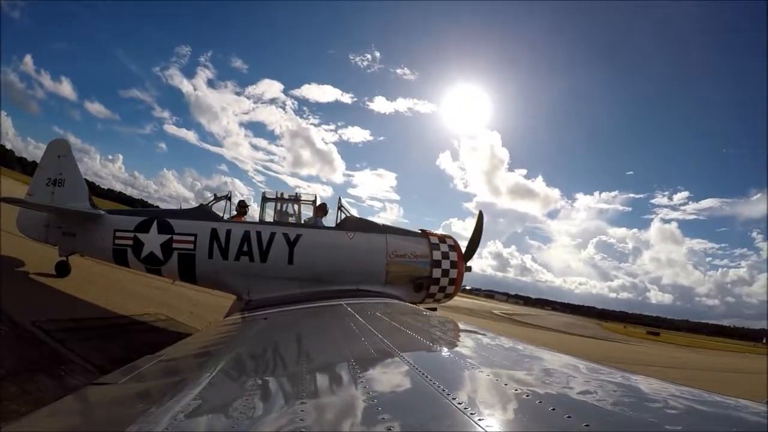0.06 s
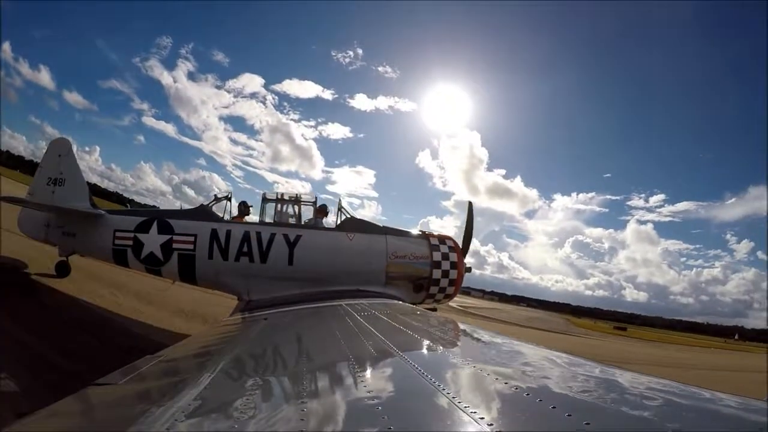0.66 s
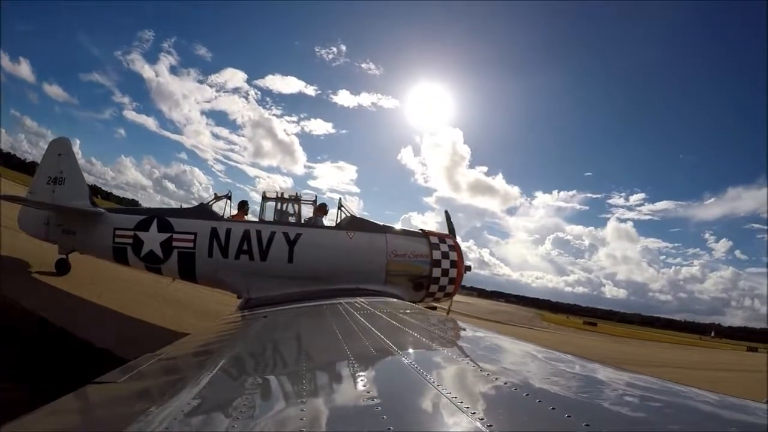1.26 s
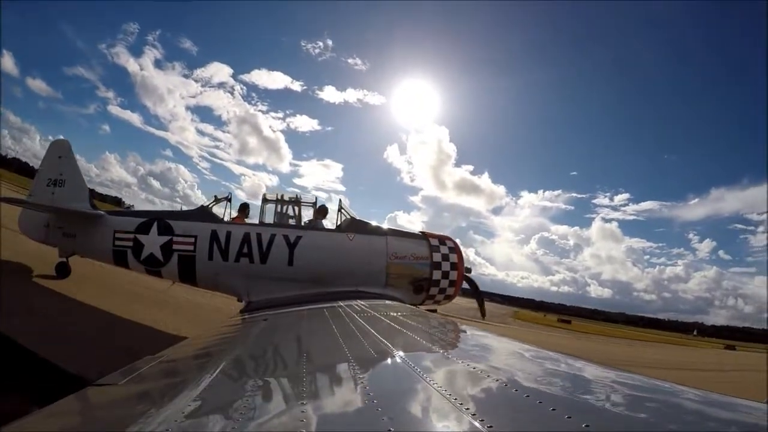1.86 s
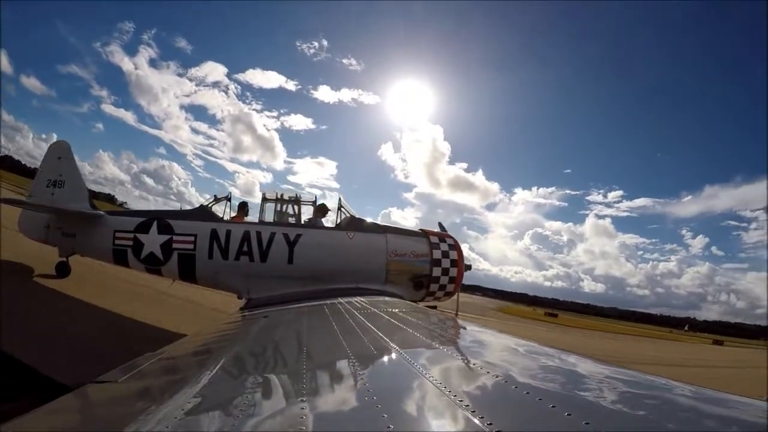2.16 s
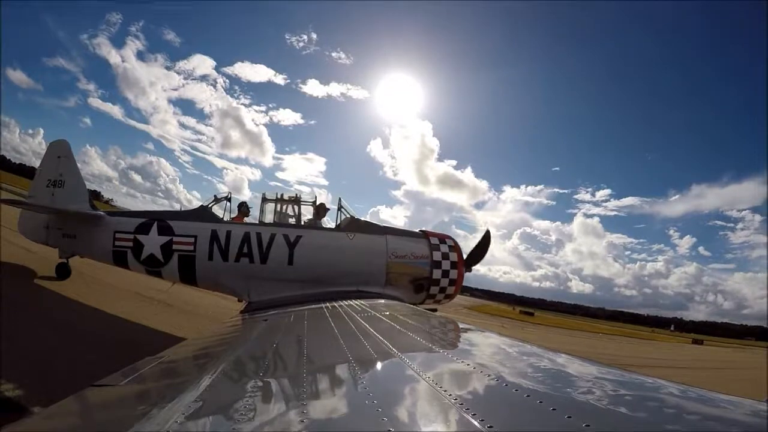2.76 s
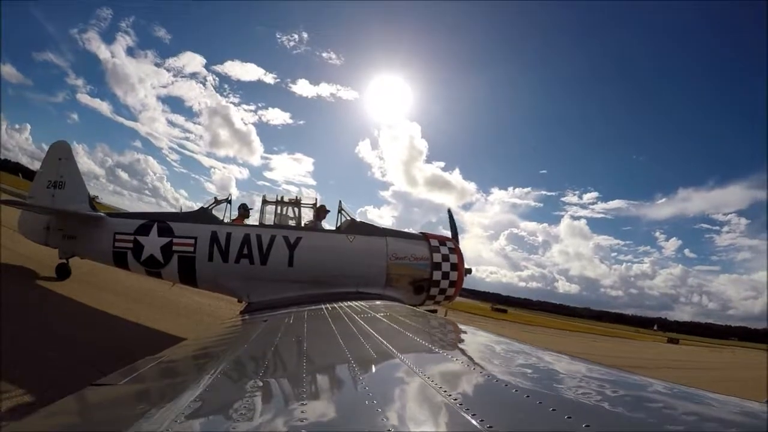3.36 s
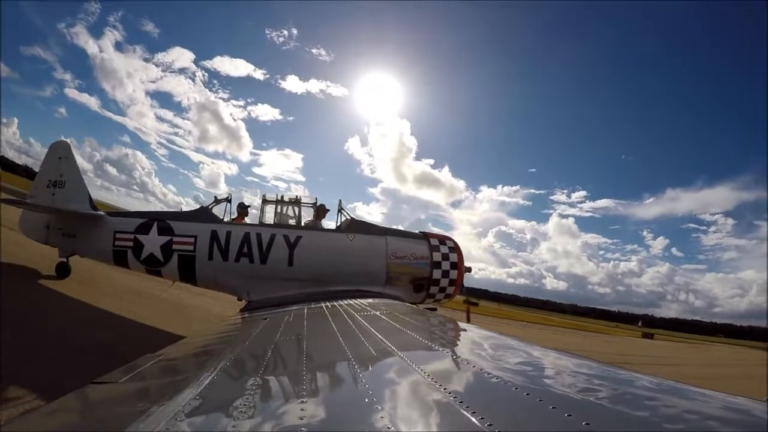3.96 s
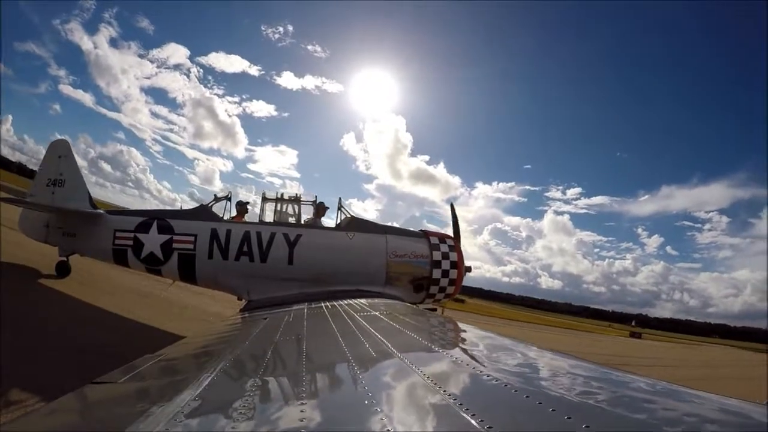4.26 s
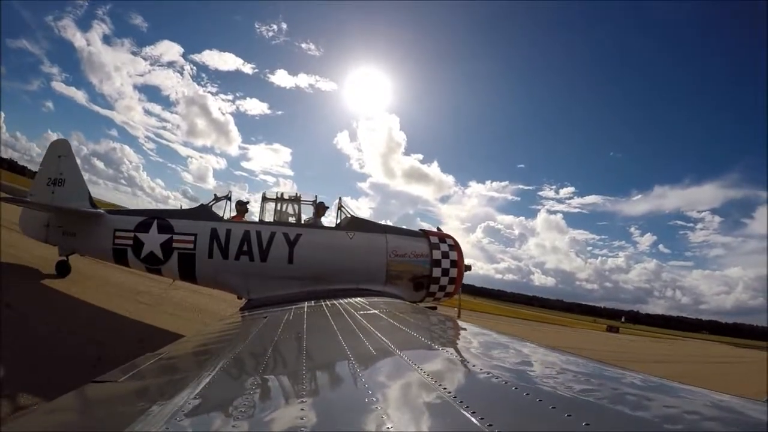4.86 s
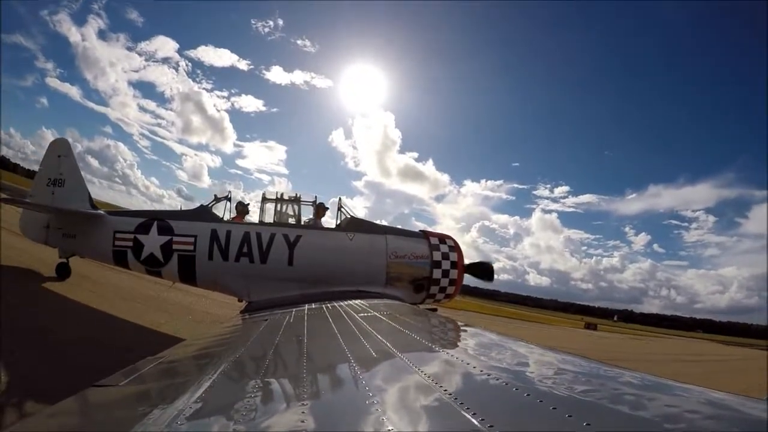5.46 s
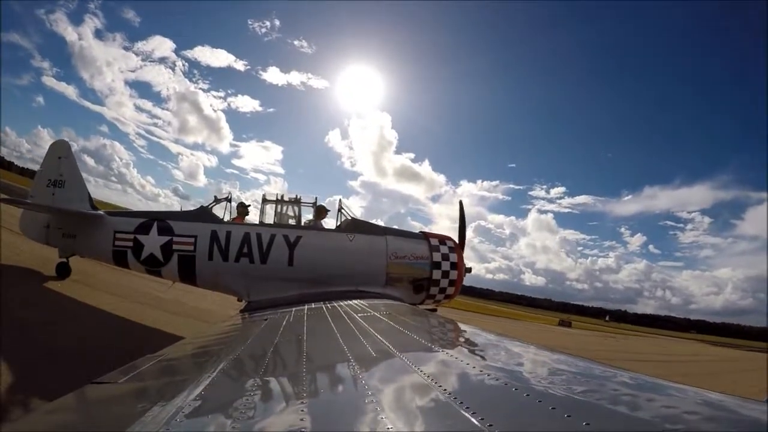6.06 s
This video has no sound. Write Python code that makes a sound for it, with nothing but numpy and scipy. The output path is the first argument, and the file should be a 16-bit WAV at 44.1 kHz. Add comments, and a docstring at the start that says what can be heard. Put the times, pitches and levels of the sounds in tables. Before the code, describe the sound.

Close up, a taxiing propeller plane's engine thumps evenly, its exhaust cracking irregularly while propeller wash rumbles on the microphone.

```python
"""A nine-cylinder radial aircraft engine taxiing at low power, close up, from a microphone on the wing.
Each cylinder thumps and spits through the exhaust in its turn; some firings crack sharply, the pipe
rings and the jet whistles at its lip. The two-blade propeller chops the air and its wash buffets the
microphone. The low layers swell, hold and sink with the engine's effort; a limiter holds the peaks."""
import sys
import numpy as np
from scipy import signal
from scipy.fft import rfft, irfft
from scipy.io import wavfile
from scipy.ndimage import uniform_filter1d, minimum_filter1d

SR = 44100
rng = np.random.default_rng(int(sys.argv[2]) if len(sys.argv) > 2 else 0)


def wav_out(sig):
    """Save sig, one row per channel (or a flat mono array), as 16-bit PCM at SR to the path in sys.argv[1]."""
    wavfile.write(sys.argv[1], SR, np.round(np.clip(np.atleast_2d(sig).T, -1, 1) * 32767).astype(np.int16))


N = 269010
TIME = np.arange(N) / SR
CYLINDERS, BLADES = 9, 2

# how hard the exhaust spits: (time [s], rasp level [dB], hiss level [dB])
SPIT_LEVELS = [(0, -56.5, -62.5), (0.5, -53, -54), (0.9, -54, -59.5), (1.45, -51, -55.5),
               (1.75, -52.5, -63.5), (2.05, -50.6, -50.5), (2.35, -54, -65), (2.8, -53, -59.5),
               (3.0, -55.5, -59.0), (3.25, -51, -59.5), (3.55, -54, -60.5), (4.0, -54, -57),
               (4.65, -49.5, -58), (4.9, -55.5, -61), (5.4, -56.5, -63), (6.1, -59, -65.5)]
# firings that crack: (time [s], level [dB], rasp offset [dB], snap offset [dB], whistle pitch [Hz])
CRACK_EVENTS = [(0.0842, -42, -11, -8, 2350), (0.404, -41.5, -13, -4.5, 2190),
                (0.4624, -39, -15, -10, 2370), (0.4748, -34, -13, -10, 3940),
                (0.5172, -35, -12, -16.5, 4350), (0.5876, -38, -10, -11, 2350),
                (0.6594, -41, -15, -10, 2400), (0.7178, -34, -7, -24, 2370), (1.1014, -30, -6, -16, 2390),
                (1.3588, -38, -15, -5, 2380), (1.487, -35, -8, -14, 2310), (1.6162, -36, -8, -14, 3100),
                (1.8736, -33.5, -2.5, -16, 2660), (2.0053, -36.5, -5, -7, 2480),
                (2.0198, -39, -3, -13, 2480), (2.0782, -37, -14, -13, 2920), (2.1335, -35, -18, -12, 2420),
                (2.2623, -32.5, -5, -11, 2300), (2.5227, -36, -3, -12, 2310),
                (2.7821, -34.5, -5, -15, 2390), (3.6845, -37.5, -3.5, -19, 2410),
                (3.8127, -36, -7, -15, 3000), (4.0701, -37.5, -7, -9, 2540),
                (4.3271, -30.5, -7.5, -25, 2470), (4.597, -34, -12.5, -13, 2460),
                (4.7112, -30, -13, -11, 3370), (5.0963, -36.5, -6, -13, 2350)]
# spectrum of gas rasping out of the pipe: (frequency [Hz], relative level [dB])
RASP_SPECTRUM = [(500, -15), (1300, -4), (1900, -7.5), (2200, -7.5), (2400, 3.5), (2750, -10.5),
                 (3050, -1.5), (3400, -7), (4200, -12), (6000, -20.5), (8000, -29), (11000, -55.5)]
# spectrum of air chopped by a blade: (frequency [Hz], relative level [dB])
CHOP_SPECTRUM = [(150, -23.5), (300, -3), (450, 2), (550, -3), (760, 4.5), (930, -1.5), (1050, 1),
                 (1170, -4), (1330, 0), (1700, -8), (2500, -21.5), (5000, -36.5), (9000, -72.5)]


def gain_of(db):
    """Decibels to amplitude."""
    return 10 ** (np.asarray(db) / 20)


def unit_rms(x):
    """Scales to rms 1."""
    return x / np.sqrt(np.mean(x ** 2) + 1e-20)


def curve(rows, column=1):
    """One column of a time table, at every sample."""
    rows = np.array(rows)
    return np.interp(TIME, rows[:, 0], rows[:, column])


def colour(x, spectrum):
    """Minimum-phase filter with the given spectrum; the result has rms 1."""
    hz, db = np.transpose(spectrum)
    grid = abs(np.fft.fftfreq(8192, 1 / SR))
    log_gain = np.log(gain_of(np.interp(np.log(grid + 1), np.log(hz + 1), db)))
    ring = np.fft.ifft(np.exp(np.conj(signal.hilbert(log_gain)))).real
    return unit_rms(signal.oaconvolve(x, ring[:len(ring) // 2])[:N])


def drift(hz):
    """Smooth random wander of rms 1, no faster than about hz."""
    f = np.fft.rfftfreq(N, 1 / SR)
    return unit_rms(irfft(rfft(rng.standard_normal(N)) * np.exp(-(f / hz) ** 2), N))


def recurring(turns, likeness):
    """Noise that partly repeats from one turn to the next."""
    turn, place = np.divmod(turns - np.floor(turns.min()), 1)
    size = int(N / np.ptp(turns))
    fresh = rng.standard_normal((int(turn.max()) + 1, size))
    carried = signal.lfilter([1], [1, -likeness], fresh, axis=0)
    return unit_rms(carried[turn.astype(int), (place * size).astype(int)])


def beats(turns):
    """Samples at which a count of turns passes a whole number."""
    return np.flatnonzero(np.diff(np.floor(turns)) > 0)


def train(at, size, shape):
    """The same shape started at each given sample, each with its own size."""
    kicks = np.zeros(N)
    kicks[at] = size
    return signal.oaconvolve(kicks, shape)[:N]


def puff(rise_s, decay_s):
    """Pressure of a burst of gas: a quick swell and an exponential fall."""
    t = TIME[:SR // 10]
    shape = (1 - np.exp(-(t / rise_s) ** 2)) * np.exp(-t / decay_s)
    return shape / shape.max()


def bursts(times, db, shape, spectrum):
    """Short puffs of coloured noise at the given times and levels."""
    envelope = train((times * SR).astype(int), gain_of(db), shape)
    return envelope * colour(rng.standard_normal(N), spectrum)


def effort_gain(top_db, follows):
    """Gain of a layer that swells and sinks by `follows` dB per dB of engine effort."""
    # engine effort: (time [s], level relative to its top [dB])
    effort = [(0, -3), (1.1, -1), (3.0, -1.2), (4.6, 0.0), (6.1, -5.5)]
    return gain_of(top_db + follows * curve(effort))


def wash(rush_db=-1.0):
    """The slipstream buffets the wing and the microphone over a soft rush of air."""
    # wind on the microphone: (frequency [Hz], relative level [dB])
    buffet_spectrum = [(10, -33), (35, -17.5), (55, -12), (76, -5), (88, -3), (100, -0.5), (112, -3),
                       (128, -14), (160, -19.5), (250, -29), (600, -52), (3000, -76.5)]
    # rushing air: (frequency [Hz], relative level [dB])
    rush_spectrum = [(100, 1), (700, 1.5), (1800, -8), (2400, -1), (4000, -9), (5200, -14), (6100, -9.5),
                     (7000, -24), (8500, -35), (11000, -72.5)]
    buffet = effort_gain(top_db=-38, follows=1.4) * colour(rng.standard_normal(N), buffet_spectrum)
    rush = gain_of(curve(SPIT_LEVELS) + rush_db) * colour(rng.standard_normal(N), rush_spectrum)
    return buffet + rush


def slaps(trim_db=-4.0):
    """Now and then a blade meets rough air and slaps."""
    # loud blade slaps: (time [s], level [dB])
    slap_events = [(0.833, -45), (0.896, -42.5), (0.928, -43), (1.029, -37.5), (2.051, -41), (2.35, -35.5),
                   (2.415, -41), (3.476, -41.5), (4.663, -43), (5.08, -41), (5.598, -44.5)]
    times, db = np.transpose(slap_events)
    return bursts(times, db + trim_db, puff(rise_s=0.0027, decay_s=0.0022), CHOP_SPECTRUM)


def blade_tones(blade, sweep_passes=0.45, waver=0.2, harmonic_limit=42):
    """The steady part of the chop: harmonics of the blade rate, the higher ones arriving first."""
    # spectrum of the blade passing: (frequency [Hz], level per harmonic [dB])
    tone_spectrum = [(250, -65.5), (310, -58.5), (370, -62), (460, -68), (560, -74.5), (700, -74.5),
                     (820, -67.5), (950, -80), (1300, -75)]
    hz, db = np.transpose(tone_spectrum)
    harmonic = np.arange(1, harmonic_limit)[:, None]
    blade_hz = np.ptp(blade) * SR / N
    gain = gain_of(np.interp(harmonic * blade_hz, hz, db, left=-100))
    delay = sweep_passes * (1 - harmonic / (2 * harmonic_limit))
    tones = gain * np.cos(2 * np.pi * harmonic * (blade - delay))
    return tones.sum(0) * (1 + waver * drift(11))


def propeller(crank, lag_passes=0.02, flutter_passes=0.0026, spread_db=0.4, chop_db=-5, tones_db=-2.0):
    """Each blade strikes the air alike, and chops through partly the same eddies as the last."""
    # strength of the chop: (time [s], level [dB])
    chop_levels = [(0, -57), (0.6, -52), (0.95, -47.5), (1.25, -52), (2.1, -53.5), (2.75, -50),
                   (3.05, -52.5), (4.3, -54), (4.65, -52), (6.1, -55.1)]
    blade = crank * BLADES - lag_passes + flutter_passes * drift(25)
    at = beats(blade)
    strength = gain_of(-spread_db * rng.standard_normal(len(at)))
    passes = train(at, strength, puff(rise_s=0.007, decay_s=0.0095))
    roughness = gain_of(3.2 * drift(530))
    chop = colour(passes * roughness * recurring(blade, likeness=0.58), CHOP_SPECTRUM)
    return gain_of(curve(chop_levels) + chop_db) * chop + gain_of(tones_db) * blade_tones(blade)


def drone(crank, waver=0.027):
    """Clean low tones: blade passing, the firing rate and their relatives."""
    # engine orders: (frequency [multiples of crankshaft speed], relative level [dB])
    orders = [(2, -7.5), (3.5, -10.5), (4.5, 2.5), (5.5, -15.5), (6, -7.5), (6.5, -15), (9, -22.5),
              (10.5, -19.5), (13.5, -18), (18, -37.5), (19.5, -27), (20, -24), (20.5, -28.5)]
    tones = np.zeros(N)
    for order, db in orders:
        gain = gain_of(db) * (1 + waver * drift(4.4))
        tones += gain * np.cos(2 * np.pi * (order * crank + rng.random()))
    return effort_gain(top_db=-36, follows=1.36) * tones


def whistle(hz, swell_cycles=5.1, decay_cycles=20.0, fall_per_s=5.6):
    """A few dozen cycles of tone that sink as the jet slows."""
    envelope = puff(swell_cycles / hz, decay_cycles / hz)
    age = TIME[:len(envelope)] - swell_cycles / hz
    falling_hz = hz * np.exp(-fall_per_s * age)
    return envelope * np.sin(2 * np.pi * np.cumsum(falling_hz) / SR)


def lip_whistles(crank, crack_db=-14.5, faint_db=-0.5, spread_db=1.5, tilt_db=-1.0,
                 share=0.8, low_hz=2300, high_hz=6400):
    """The jet whistles at the pipe's lip: on every crack, and faintly at a chance pitch on many firings."""
    at = beats(crank * CYLINDERS / 2)
    chance, pitch = rng.random((len(at), 2)).T
    pitches_hz = low_hz * (high_hz / low_hz) ** (pitch ** 1.5)
    scatter_db = spread_db * rng.standard_normal(len(at))
    levels_db = curve(SPIT_LEVELS)[at] + faint_db + scatter_db + tilt_db * pitch
    faint = np.transpose([at / SR, pitches_hz, levels_db])[chance < share]
    loud = [(start_s, hz, db + crack_db) for start_s, db, _, _, hz in CRACK_EVENTS]
    out = np.zeros(N)
    for start_s, hz, db in np.vstack([faint, loud]):
        tone = gain_of(db) * whistle(hz)
        rest = out[int(start_s * SR):]
        rest[:len(tone)] += tone[:len(rest)]
    return out


def pipe(gas):
    """Adds the short metallic ring of the exhaust pipe."""
    # pipe resonances: (frequency [Hz], bandwidth [Hz], gain [dB])
    modes = [(2375, 81, -4.5), (2770, 130, -9.5), (3050, 72, -1.5), (3680, 140, -6)]
    return gas + sum(gain_of(db) * signal.lfilter(*signal.iirpeak(hz, hz / width, fs=SR), gas)
                     for hz, width, db in modes)


def cracks(rasp_trim_db=-6.5, snap_trim_db=-2.0):
    """The loudest firings crack out of the pipe: a burst of rasp with a bright snap."""
    # bright edge of a crack: (frequency [Hz], relative level [dB])
    snap_spectrum = [(1500, -16.5), (3000, 0), (4000, 3), (5000, -5.5), (6000, 3.5), (7000, -6),
                     (8500, -18), (10400, -26.5), (11500, -37)]
    times, db, rasp_db, snap_db, _ = np.transpose(CRACK_EVENTS)
    shape = puff(rise_s=0.0014, decay_s=0.0034)
    rasp = bursts(times, db + rasp_db + rasp_trim_db, shape, RASP_SPECTRUM)
    snap = bursts(times, db + snap_db + snap_trim_db, shape, snap_spectrum)
    return rasp + snap


def exhaust(crank, lead_firings=0.15, jitter_s=0.00072, push_db=-10, rasp_trim_db=-7.5,
            hiss_trim_db=-4.0, push_spread_db=3.5, rasp_spread_db=2.5, hiss_spread_db=3.5):
    """Every cylinder fires once in two turns: a thump, a rasp and a jet of hiss."""
    # balance of the cylinders, in firing order: (thump [dB], rasp [dB], hiss [dB])
    cylinder_levels = [(-7.5, -4.5, -11.5), (4.5, -4.5, 7), (2.5, -2, 4), (6, -10.5, -1.5), (1, -2.5, -5),
                       (-2.5, 0, 2.5), (7, 3, 4.5), (-10, 1, 4.5), (5, -11, -7.5)]
    # low pulse of a firing: (frequency [Hz], relative level [dB])
    thump_spectrum = [(20, -65.5), (60, -14.5), (100, -4.5), (135, 3), (152, -3), (175, 1), (215, -1),
                      (240, -17), (278, -2.5), (310, 2), (345, -7.5), (400, -15.5), (600, -29), (1500, -56)]
    # jet of escaping gas: (frequency [Hz], relative level [dB])
    hiss_spectrum = [(1500, -1.5), (3000, -5), (4000, 2), (5200, 0.5), (5900, 6.5), (6400, 2.5),
                     (7000, -4.5), (8500, -19.5), (10400, -32.5), (11500, -22.5)]
    firing = crank * CYLINDERS / 2 + lead_firings
    at = beats(firing)
    cylinder = np.round(firing[at]).astype(int) % CYLINDERS
    thump_db, rasp_db, hiss_db = np.array(cylinder_levels)[cylinder].T
    late, weight, burn, jet = rng.standard_normal((len(at), 4)).T
    at = np.clip(at + (late * jitter_s * SR).astype(int), 0, N - 1)
    push = train(at, gain_of(thump_db + push_spread_db * weight), [1.])
    puffs = train(at, gain_of(thump_db), puff(rise_s=0.0033, decay_s=0.0049))
    # each cylinder's gas swirls down the pipe much as it did the cycle before
    swirl = puffs * recurring(crank / 2, likeness=0.85)
    thump = colour(gain_of(push_db) * unit_rms(push - push.mean()) + unit_rms(swirl), thump_spectrum)
    valve = signal.windows.hann(int(0.016 * SR)) ** 2  # the valve opens and shuts smoothly
    rasp_flow = train(at, gain_of(rasp_db + rasp_spread_db * burn), valve)
    hiss_flow = train(at, gain_of(hiss_db + hiss_spread_db * jet), valve)
    spurts = gain_of(1.5 * drift(700))  # the gas leaves raggedly
    rasp = colour(rasp_flow * spurts * rng.standard_normal(N), RASP_SPECTRUM)
    hiss = colour(hiss_flow * spurts * rng.standard_normal(N), hiss_spectrum)
    return (effort_gain(top_db=-47.6, follows=0.77) * thump
            + gain_of(curve(SPIT_LEVELS) + rasp_trim_db) * rasp
            + gain_of(curve(SPIT_LEVELS, column=2) + hiss_trim_db) * hiss)


def scene():
    """The sound at the wing, in mono: the crankshaft drives exhaust and propeller together."""
    # crankshaft speed: (time [s], speed [turns/s])
    crank_speed = [(0.0, 16.072), (0.3, 15.879), (0.6, 15.595), (1.0, 15.604), (1.5, 15.538), (1.9, 15.416),
                   (2.4, 15.447), (3.0, 15.498), (3.5, 15.492), (4.0, 15.572), (4.6, 15.639), (5.1, 15.536),
                   (5.7, 15.587), (6.1, 15.482)]
    crank = np.cumsum(curve(crank_speed)) / SR  # angle in turns
    engine = drone(crank) + pipe(exhaust(crank) + cracks()) + lip_whistles(crank)
    return (engine + propeller(crank) + slaps() + wash())[None]


def record(dry, ceiling_db=-29.5, drive_db=0.08, cutoff_hz=10900):
    """Behind the microphone, a fast look-ahead limiter holds the bass peaks and a low-pass follows."""
    driven = dry[0] * gain_of(drive_db)
    bass = uniform_filter1d(driven, size=24)
    allowed = np.minimum(1, gain_of(ceiling_db) / (abs(bass) + 1e-9))
    gain = uniform_filter1d(minimum_filter1d(allowed, size=500), size=400)
    lowpass = signal.firwin(255, cutoff_hz, window=("kaiser", 8), fs=SR)
    return signal.oaconvolve(driven * gain, lowpass, "same")[None]


dry = scene()
out = record(dry)
wav_out(out)
```